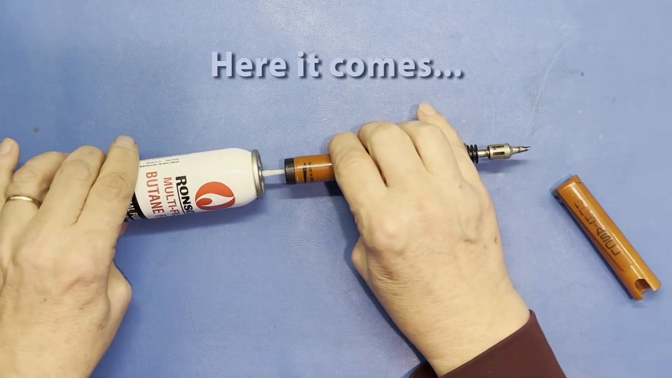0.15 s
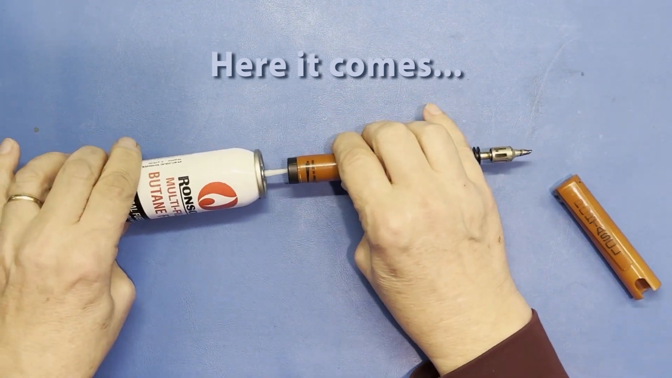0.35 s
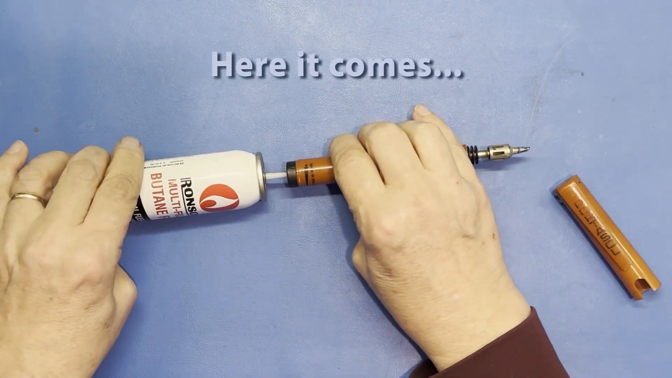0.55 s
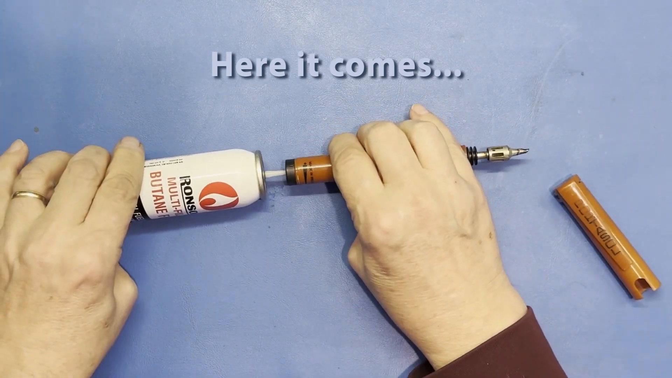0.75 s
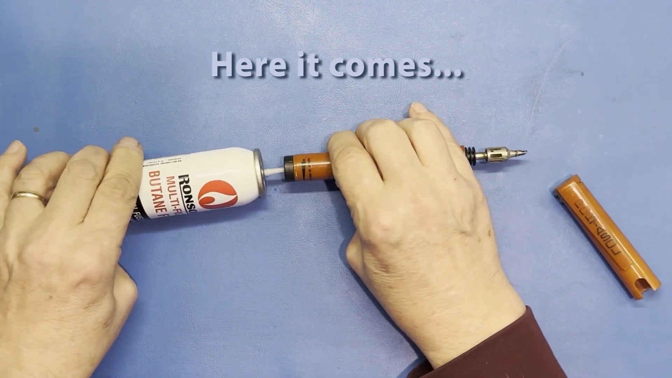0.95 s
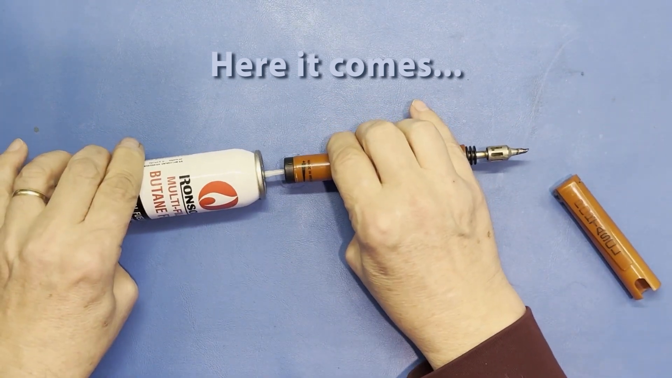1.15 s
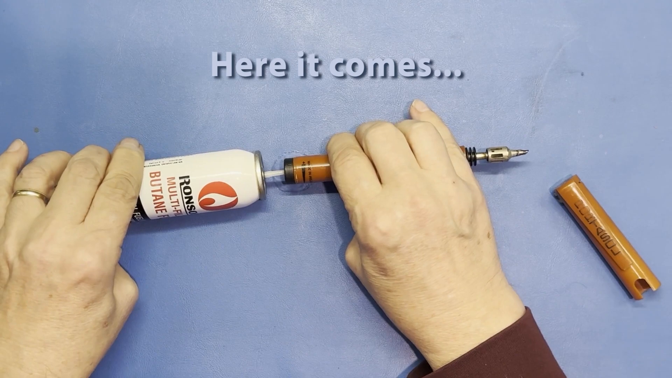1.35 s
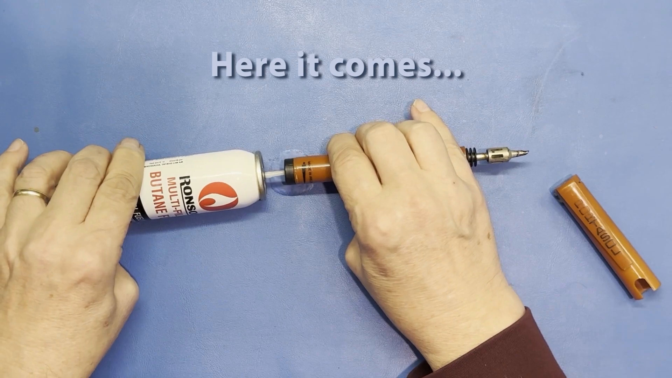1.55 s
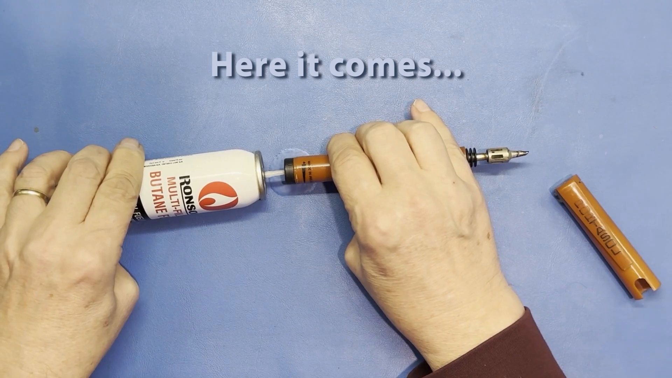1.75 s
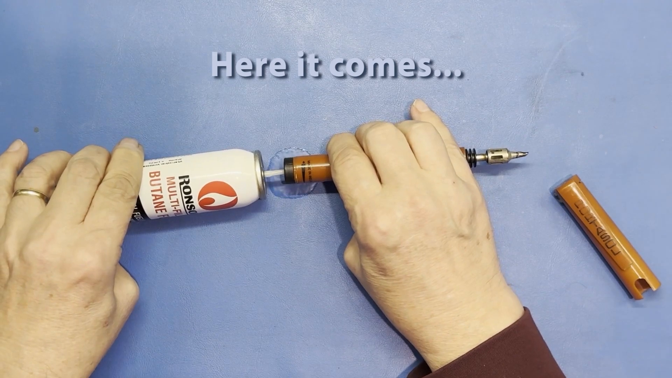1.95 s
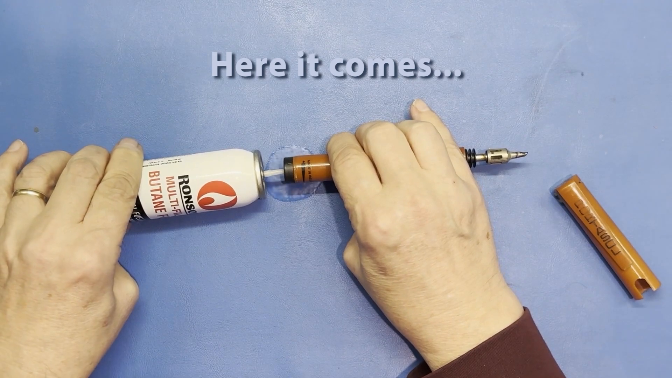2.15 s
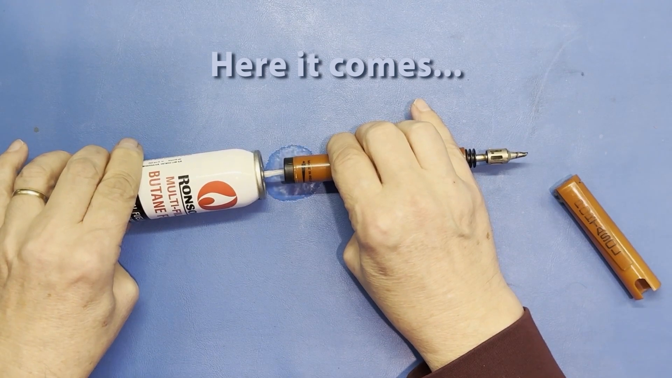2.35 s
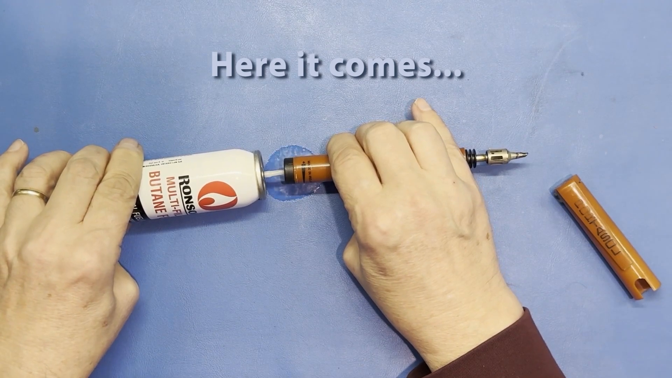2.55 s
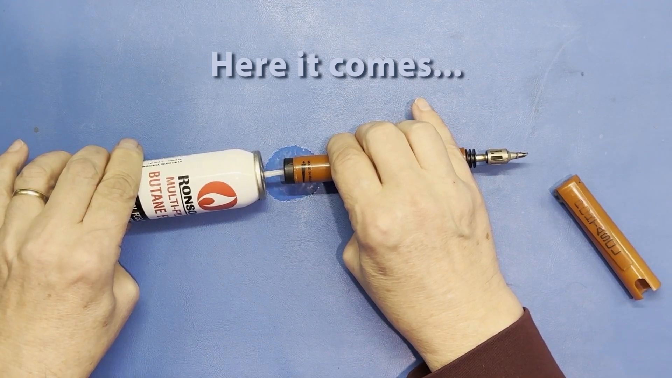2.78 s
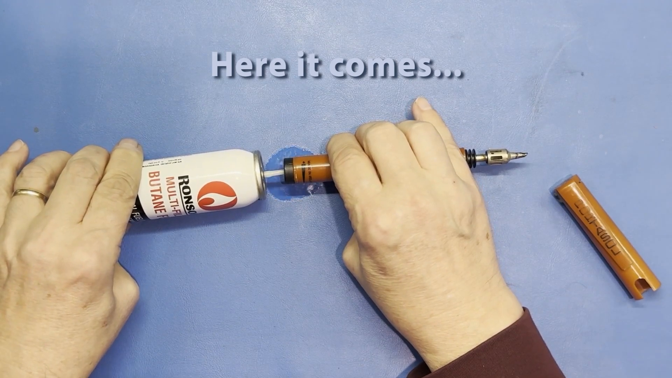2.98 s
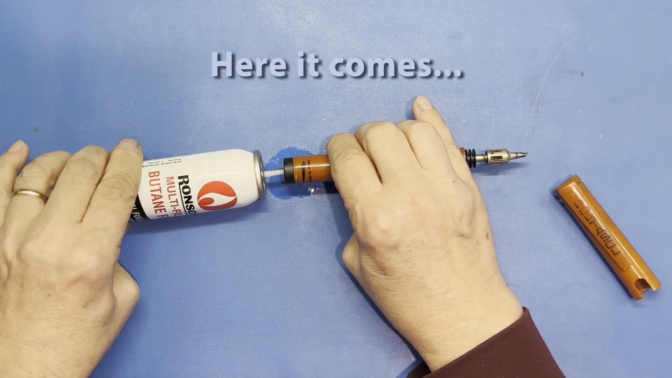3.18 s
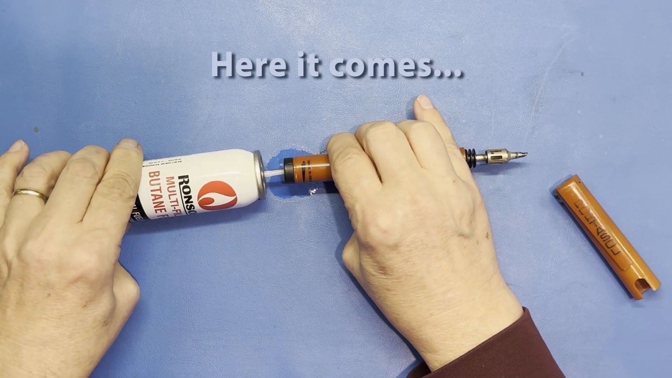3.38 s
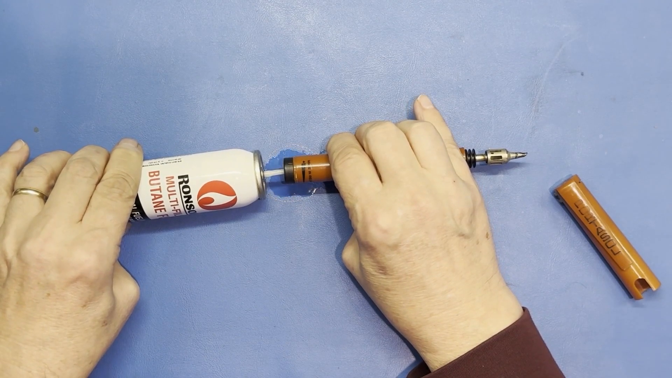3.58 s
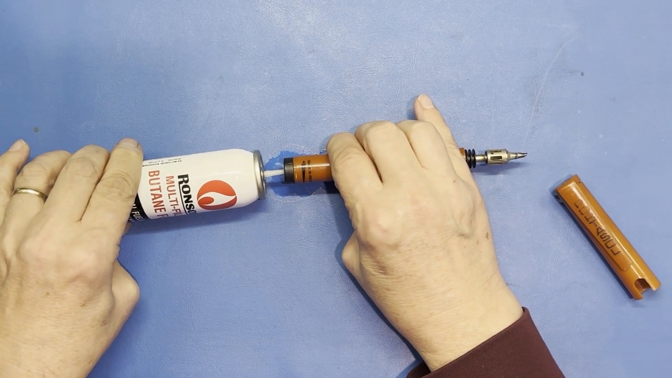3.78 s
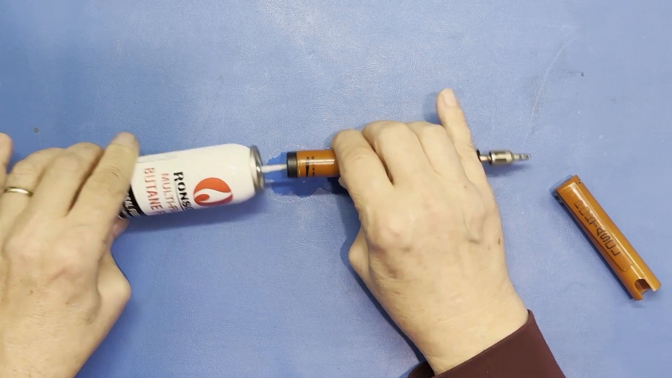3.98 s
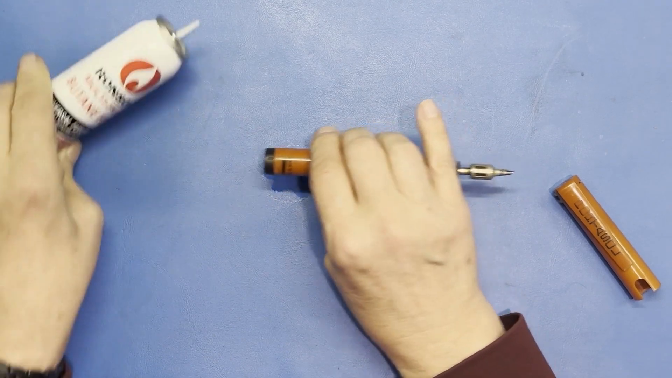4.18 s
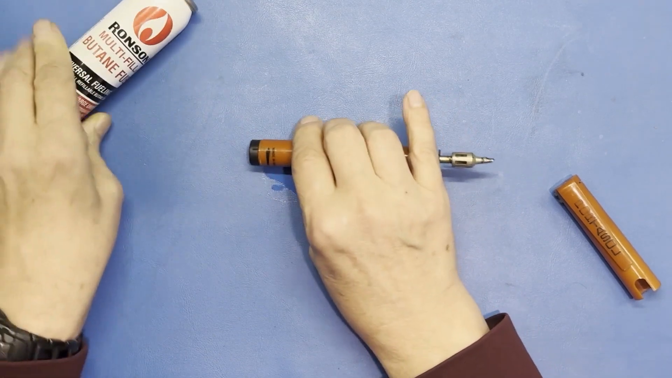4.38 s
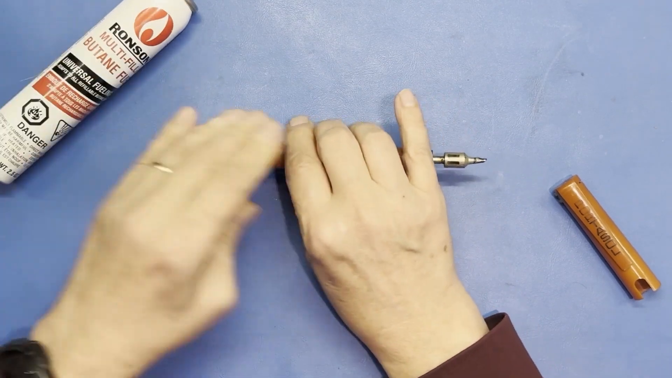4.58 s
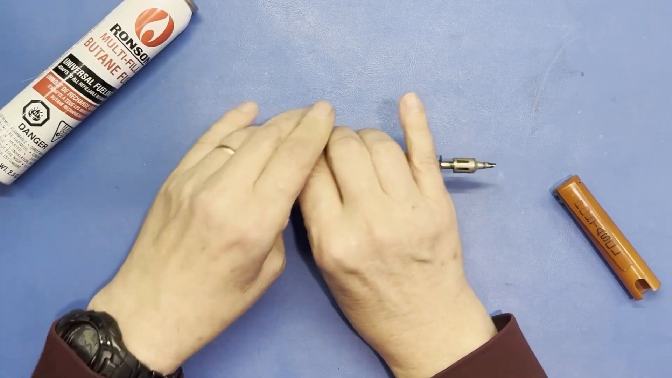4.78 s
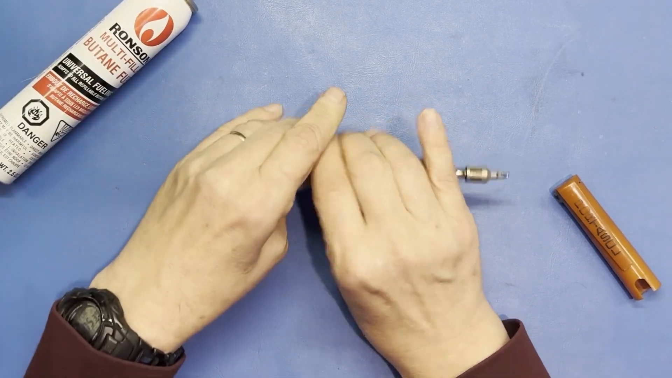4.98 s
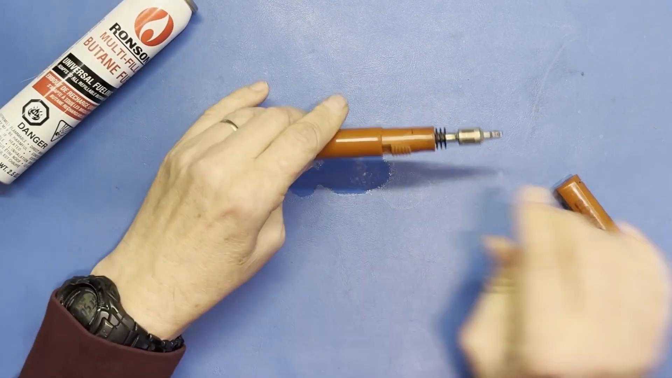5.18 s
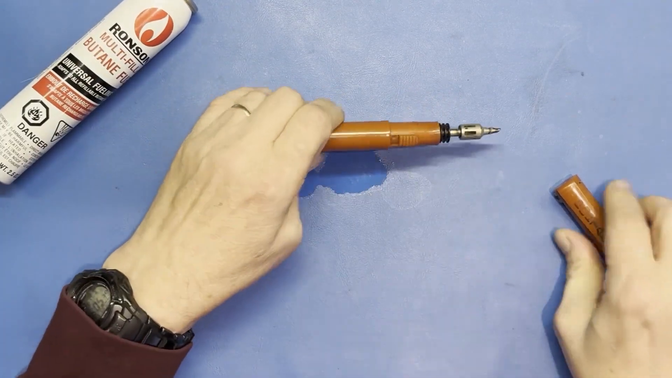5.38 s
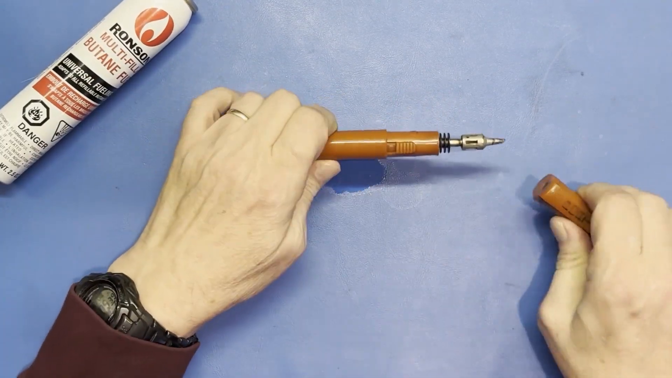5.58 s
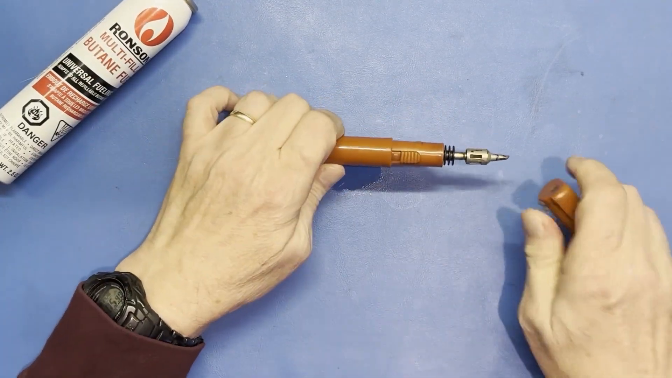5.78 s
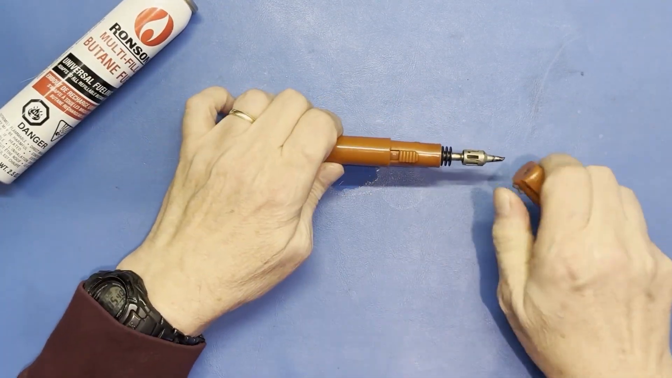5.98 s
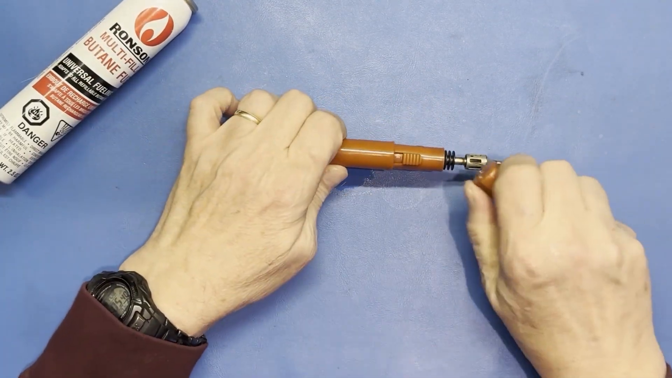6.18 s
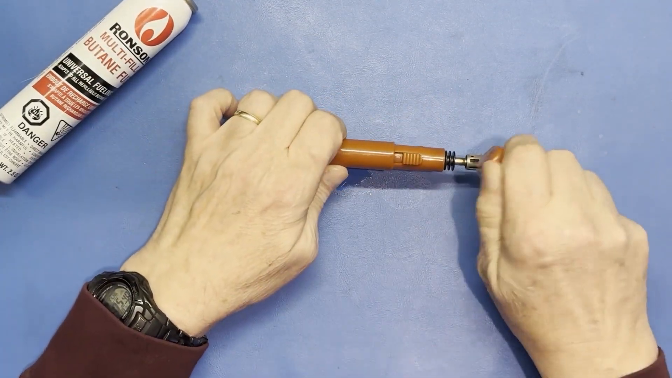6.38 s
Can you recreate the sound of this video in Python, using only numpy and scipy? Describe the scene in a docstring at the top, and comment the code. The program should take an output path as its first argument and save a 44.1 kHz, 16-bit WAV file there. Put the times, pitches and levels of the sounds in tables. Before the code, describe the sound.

Close stereo view of a bench in a small, quiet room, with faint low rumble and barely audible hum throughout. Near silence until 0.43 s, when a light tick opens a valve and gas spits out with an airy rush, quickly growing. At 0.78 s a hard snap with a short metallic ring and thud seats the nozzle. The hiss turns bright and narrow, strong until about 1.1, weaker and sputtering to 2, then uneven swells around 2.1-2.5 and a steady rise from 2.8. At 3.83 a sharp click loosens the joint; the jet dies abruptly at 3.88, another click at 3.94. Spilt liquid crackles and fizzes, fading quickly to a faint simmer. Clustered dull bumps at 4.17-4.3 include a light metal rim tap. A soft knock comes at 4.7, then small ticks, finger rubs and a brief drag at 4.95-5.6. Quiet fizz slowly rises until a short cap scrape at 6.35.

```python
"""First comes a faint low rumble, then a light tick and a spitting hiss as a butane can opens a valve.
The can is pressed into a soldering iron's filler valve; gas and droplets spray from the leaky joint.
The nozzle snaps into its seat, and the jet stops when the can is pulled back.
Spilt butane fizzes on the mat while the can is laid down, the iron is picked up and its cap scrapes.
Shaped noise makes the gas, liquid and rubbing; short bursts and ringing tones make the contacts."""
import sys
import numpy as np
from scipy import signal
from scipy.fft import rfft, irfft, next_fast_len
from scipy.io import wavfile
from scipy.ndimage import uniform_filter1d, map_coordinates

SR = 44100
rng = np.random.default_rng(int(sys.argv[2]) if len(sys.argv) > 2 else 0)


def store_wav(level_fs):
    """Save 16-bit WAV to argv[1]."""
    pcm = np.round(np.clip(np.atleast_2d(level_fs), -1, 1) * 32767)
    wavfile.write(sys.argv[1], SR, pcm.T.astype(np.int16))


N = 283563

# Levels of layers are relative: the final mix scales them. Spectra set only the balance of pitches.

# rumble of the bench: (frequency [Hz], level [dB per Hz])
BENCH_SPECTRUM = [(12, -5.5), (20, -5), (33, 5.5), (45, -10), (65, -12.5), (100, -16), (140, -26),
                  (220, -57)]
# shaking of the microphone mount: (frequency [Hz], level [dB per Hz])
MOUNT_SPECTRUM = [(10, -15.5), (16, -10), (24, 4.5), (33, -1.5), (45, -14), (65, -25), (110, -18.5),
                  (220, -64)]
# leaning on the bench: (time [s], peak [dB], rise [s], fall [s])
BENCH_LEANS = [(0.78, -58, 0.23, 0.47), (4.36, -41.5, 0.16, .14)]
# room air: (frequency [Hz], level [dB per Hz])
ROOM_SPECTRUM = [(50, -29), (90, -3), (150, -4), (320, -7.5), (600, -14), (1000, -22), (2000, -27.5),
                 (8000, -33.5), (11000, -46), (13000, -75.5)]
# mains hum: (frequency [Hz], left level [dB], right level [dB])
HUM_TONES = [(62, -68.5, -74.5), (122, -67, -81), (481, -84, -77)]
SWAY_DB, SWAY_FADE_DB_PER_S = -61, 1.7  # rumble under the hands, less as they relax
ROOM_DB = -69.5

# how alike left and right are for the jet and hard contacts: (frequency [Hz], likeness [0-1])
JET_LIKENESS = [(100, 0), (330, 0.53), (700, 1), (1100, 1), (3100, 1), (4200, 0.67), (7500, 0.66),
                (9500, 0.87), (14000, 0.02)]
# the same for spread-out sounds: (frequency [Hz], likeness [0-1])
SPREAD_LIKENESS = [(130, 0.19), (380, 0.38), (700, 0.66), (1300, 0.85), (2800, 0.99), (4200, 0.64),
                   (7500, 0.54), (14000, 0.19)]
# how long the room's answer lasts: (frequency [Hz], time to fall 60 dB [s])
ROOM_DECAY = [(300, .1), (1500, .06), (4000, .14), (12000, 0.32)]
# reflections off nearby surfaces: (delay [s], level [dB], extra treble delay on the left [s])
EARLY_ECHOES = [(.0031, -24, .00002), (.0074, -16, -.00003), (0.0124, -21.5, .00004),
                (0.0184, -22, -.00002)]

# blows passed into the bench: (time [s], level [dB], brightness [Hz])
BENCH_KNOCKS = [(0.075, -49.5, 600), (0.78, -24, 1010), (1.103, -42.5, 240), (3.882, -42, 504),
                (4.167, -26.5, 350), (4.218, -22, 460), (4.263, -27, 457), (4.296, -22.5, 503),
                (4.713, -39.5, 290), (5.306, -42.5, 86), (5.377, -40, 130)]
# resonances of the bench: (frequency [Hz], width [Hz], level [dB])
BENCH_RESONANCES = [(67, 30, 6), (130, 54, 0.5), (212, 52, -4), (364, 230, -5.5), (684, 380, -3.5)]
# a tap of the can's rim: (frequency [Hz], level [dB per Hz])
RIM_SPECTRUM = [(500, -16), (1300, -7), (2450, 3.5), (3500, -9), (5500, -6), (9000, -10), (12500, -8),
                (14500, -30)]
RIM_S = 4.29  # the rim touches down

# light contacts of nozzle, barrel and fingers: (time [s], level [dB], time to fall 60 dB [s])
LIGHT_CONTACTS = [(0.429, -38, 0.043), (3.827, -15, .02), (3.943, -26.5, .03), (4.263, -46, .025),
                  (4.956, -32.5, 0.022), (5.109, -36, 0.011), (5.156, -43, .012), (5.177, -43, .015),
                  (5.297, -32, 0.014), (5.348, -38.5, 0.093), (6.348, -34, 0.084)]
# small hard parts, also the scraping cap: (frequency [Hz], level [dB per Hz])
HARD_PART_SPECTRUM = [(350, -50), (600, -33), (765, -10), (1600, -23.5), (4970, -8), (6690, 4.5),
                      (9490, 0.5), (10700, -11), (12400, 3), (13300, -13.5), (15000, -77.5)]
# fingers sliding on the barrel: (time [s], peak [dB], rise [s], fall [s])
FINGER_RUBS = [(4.96, -58.5, .025, .1), (5.16, -51.5, 0.078, 0.068), (5.27, -56, .01, 0.022),
               (5.342, -49.5, .006, .01), (5.49, -55, 0.049, 0.043), (5.612, -60, .012, 0.053)]
# skin on the barrel: (frequency [Hz], level [dB per Hz])
SKIN_SPECTRUM = [(180, -48), (300, -12), (1230, -2), (3070, -7.5), (4250, -12), (4770, -3), (5800, -31),
                 (6510, 0), (10800, 0.5), (12500, 8), (15000, -20)]
# the iron on the mat: (frequency [Hz], level [dB per Hz])
MAT_SPECTRUM = [(50, 7), (110, 13), (250, 7), (500, -9), (1200, -9), (3300, 4), (4800, -10), (7000, -16),
                (14000, -46)]
# the iron drags over the mat; the cap slides over the tip (peak time first)
DRAG_S, DRAG_DB, DRAG_RISE_S, DRAG_FALL_S = 5.387, -51.5, 0.02, 0.064
CAP_S, CAP_DB, CAP_RISE_S, CAP_FALL_S = 6.347, -27.5, 0.0064, 0.0038

# boiling of the fresh puddle: (frequency [Hz], level [dB per Hz])
FRESH_SPECTRUM = [(530, -25), (900, -17.5), (1080, -23), (1180, -18), (1360, -20), (2010, -18.5),
                  (2790, -9), (3250, -10), (4060, -5), (4320, -2.5), (5600, -21), (7280, -50),
                  (12300, -120)]
# boiling of the shrinking puddle: (frequency [Hz], level [dB per Hz])
DRYING_SPECTRUM = [(410, -64), (700, -31), (1120, -21), (1370, -24.5), (1990, -21), (2100, -16.5),
                   (2430, -13.5), (2970, -3.5), (3690, -11), (3850, -10), (4430, 1.5), (4750, -12.5),
                   (5600, -13), (7280, -41), (12300, -120)]
# bursting bubbles: (frequency [Hz], level [dB per Hz])
BUBBLE_SPECTRUM = [(2940, -31), (5000, -8), (5400, -10), (6340, -1), (7560, -0.5), (8940, -1),
                   (10800, -4.5), (11700, -22), (12500, -10), (14000, -37)]
# flare-ups of the disturbed puddle: (time [s], extra level [dB], half length [s])
PUDDLE_FLARES = [(4.42, 3, .045), (5.4, 4.5, 0.083)]
SIMMER_DB, SIMMER_FADE_DB_PER_S = -52.5, 5  # the fresh puddle cools the mat and calms down
DRY_S, DRYING_DB, DRYING_GROW_DB_PER_S = 5.15, -61.5, 4  # its thinning edge boils harder again
CRACKLE_DB, FRESH_CRACKLE_DB, CRACKLE_SETTLE_S = -66.5, 23, 0.35  # settled, extra at first, settling time

# the nozzle snapping home: (frequency [Hz], level [dB per Hz])
SNAP_SPECTRUM = [(60, 9), (130, -7), (330, 10.5), (580, -13), (760, 5.5), (1100, -9), (2000, -9.5),
                 (3000, -18), (4000, -3), (4900, -1), (6000, 3.5), (7200, 1.5), (9300, -1), (10600, -29),
                 (12200, -24), (14000, -55)]
# ringing tones of the can: (frequency [Hz], level [dB], time to fall 60 dB [s])
CAN_TONES = [(732, -9.5, 0.083), (910, -16, 0.029), (3520, -3.5, 0.036), (5900, -2, .035)]
SEAT_S = 0.7797  # the nozzle snaps home

# strength of the jet, following the push on the can: (time [s], hiss level [dB])
JET_STRENGTH = [(0.44, -42), (0.57, -30), (1.04, -24), (1.12, -32), (1.14, -30.5), (1.5, -34.5),
                (1.61, -32.5), (1.75, -35), (2.07, -29.5), (2.09, -27), (2.31, -25), (2.37, -29.5),
                (2.39, -24), (2.45, -28), (2.63, -31.5), (2.77, -28), (3.58, -26), (3.86, -21)]
# hiss of the gap with the nozzle loose: (frequency [Hz], level [dB per Hz])
LOOSE_HISS = [(3120, -62), (5300, -19), (5860, -15), (6300, -10), (7500, 0.5), (8560, -12.5), (9520, -7),
              (10600, -22), (11200, -7), (14600, -54), (22000, -120)]
# hiss of the gap with the nozzle just seated: (frequency [Hz], level [dB per Hz])
SEATED_HISS = [(3120, -57), (5300, -48), (6500, -5.5), (7940, 2), (8480, 1.5), (9400, -4), (10300, -8),
               (10800, -23), (11200, 2), (14600, -51.5), (22000, -120)]
# hiss of the gap in steady flow: (frequency [Hz], level [dB per Hz])
FLOWING_HISS = [(3120, -47), (5300, -23), (5580, -25), (6200, -10.5), (6680, -9), (7050, 0.5), (7370, 1.5),
                (8680, 0.5), (9740, -7.5), (10500, -6), (11100, -39), (11400, -20), (14800, -34),
                (22000, -120)]
# lower rush of the loose joint: (frequency [Hz], level [dB per Hz])
LOOSE_RUSH_SPECTRUM = [(150, -44), (250, -12), (277, -18), (480, -18), (677, -9), (1100, -11.5), (1880, -7),
                       (2220, -11), (3220, -2), (3900, -3.5), (4210, 0), (5300, -11.5), (6890, -36),
                       (11700, -120)]
# lower rush of the seated joint: (frequency [Hz], level [dB per Hz])
SEATED_RUSH_SPECTRUM = [(150, -43.5), (250, -26), (342, -17.5), (385, -23.5), (433, -20), (925, -10),
                        (1140, -14), (1600, -6), (2220, -10.5), (2670, -3), (3000, -1), (3470, -6.5),
                        (4160, 2), (5480, -7.5), (5700, -1.5), (7410, -27), (12500, -120)]
# fine spray before much liquid arrives: (frequency [Hz], level [dB per Hz])
DRY_SPRAY_SPECTRUM = [(6290, -24), (10700, -29), (11500, 1.5), (12100, -2.5), (12600, 4), (13600, -34),
                      (14400, -35), (14800, -45)]
# fine spray with more liquid: (frequency [Hz], level [dB per Hz])
WET_SPRAY_SPECTRUM = [(6410, -53.5), (10900, 3), (11300, 3), (12200, 9.5), (13900, 6), (14500, -22),
                      (15300, -32)]
# spurts of liquid that swell the fine spray: (time [s], extra level [dB], half length [s])
LIQUID_SPURTS = [(0.57, 6, 0.035), (0.98, 7, 0.043), (2.325, 0, .02), (2.45, 2, 0.027), (3.84, 3.5, 0.027)]
# steady dips in the hiss: (frequency [Hz], width [Hz], depth [dB])
STEADY_DIPS = [(2260, 48, -7.5), (3535, 47, -9)]
OPEN_S, OPEN_RISE_S = 0.4305, 0.0094  # the valve opens
SHUT_S, SHUT_FALL_S = 3.876, 0.0098  # the can is pulled back and the jet dies
RUSH_DB, RUSH_LAG = -16.5, 0.14  # rush against the hiss, and the dB it lags per dB of hiss
PART_S, PART_SHARE = 3.83, 0.38  # the joint starts to come apart, and how loose it gets (0-1)
LOOSE_RUSH_DB, TIGHTEN_S, LOOSEN_S = 8, 0.36, 0.019  # extra rush when loose; time to tighten, to part
SPRAY_DB = -7.5  # fine spray against the hiss
# a moving dip: where it is at seating, where it ends up, and its creeping time
HOLLOW_SEATED_HZ, HOLLOW_FLOWING_HZ, HOLLOW_CREEP_S = 4810, 5630, 0.9

TOP_HZ = 15100  # upper limit of the finished sound


def amp(db):
    """Decibels to gain."""
    return 10 ** (np.asarray(db) / 20)


def unit(x):
    """Scale to an average (rms) strength of 1."""
    return x / np.sqrt(np.mean(x ** 2) + 1e-20)


def along(points, hz):
    """Read a curve of (frequency, value) points on a log frequency axis."""
    f, values = np.transpose(points)
    return np.interp(np.log(hz + 1), np.log(f + 1), values)


def clock():
    """The time of each sample in seconds."""
    return np.arange(N) / SR


def short_clock():
    """The time of each sample in a quarter-second sound."""
    return np.arange(SR // 4) / SR


def blend(a, b, start, length):
    """Fade steadily from sound a to sound b."""
    share = np.clip((clock() - start) / length, 0, 1)
    return a * (1 - share) + b * share


def held(start, end, rise, fall):
    """Gain 1 from start to end, with an exponential rise before and fall after."""
    t = clock()
    return np.exp(np.minimum(t - start, 0) / rise - np.maximum(t - end, 0) / fall)


def stroke(s, db, rise, fall):
    """A movement swells to its peak at s and dies away."""
    return amp(db) * held(s, s, rise, fall)


def swells(rows):
    """Gain of brief bell-shaped rises above a steady level."""
    t = clock()
    return amp(sum(db * np.exp(-((t - s) / length) ** 2) for s, db, length in rows))


def wobble(rate):
    """A smooth random curve through this many random points a second."""
    knots = rng.standard_normal(int(N * rate / SR) + 4)
    return map_coordinates(knots, [np.arange(N) * rate / SR])


def spits(rate, size, life):
    """Envelope of a steady flow with brief bursts of random size (rate per second, life in s)."""
    bursts = (rng.random(N) < rate / SR) * rng.exponential(size=N)
    fading = signal.lfilter([1], [1, -np.exp(-1 / (life * SR))], bursts)
    return np.sqrt(1 + size * fading)


def turbulence(patchy_db):
    """Two white noises sharing the same drifting patches of louder and softer pitch."""
    z = signal.stft(rng.standard_normal((2, N)), nperseg=512)[2]
    patches = uniform_filter1d(rng.standard_normal(z.shape[1:]), size=4, axis=0)  # smooth over pitch
    patches = uniform_filter1d(patches, size=22, axis=1)  # smooth over time
    return signal.istft(z * amp(patchy_db * unit(patches)), nperseg=512)[1][:, :N]


def filtered(x, response):
    """Filter x with a gain that depends on frequency, complex if it also shifts timing."""
    n = x.shape[-1]
    padded = next_fast_len(n + 8192)
    return irfft(rfft(x, padded) * response(np.fft.rfftfreq(padded, 1 / SR)), padded)[..., :n]


def coloured(pair, spectrum, alike=SPREAD_LIKENESS):
    """Two unrelated signals become left and right with this spectrum and likeness."""
    def response(hz):
        likeness = np.clip(along(alike, hz), -1, 1)
        return amp(along(spectrum, hz)) * np.sqrt([1 + likeness, 1 - likeness])
    mid, side = filtered(pair, response)
    return np.array([mid + side, mid - side])


def noise(spectrum, patchy_db, flutter=1):
    """Spread-out stereo noise of rms 1."""
    return unit(coloured(turbulence(patchy_db) * flutter, spectrum))


def crack(spectrum, t60):
    """A dying burst of noise with peak 1, falling 60 dB in t60 seconds."""
    t = short_clock()
    burst = coloured(rng.standard_normal((2, len(t))), spectrum, JET_LIKENESS)
    burst = burst * amp(-60 * t / t60)
    return burst / np.abs(burst).max()


def add(track, s, sound):
    """Mix a sound into the track at time s."""
    part = track[..., round(s * SR):][..., :sound.shape[-1]]
    part += sound[..., :part.shape[-1]]


def rumble(spectrum):
    """One channel of shaped noise with rms 1."""
    return unit(filtered(rng.standard_normal(N), lambda hz: amp(along(spectrum, hz))))


def background():
    """The bench sways and the microphone mount shakes, over faint room air and mains hum."""
    t = clock()
    sway = amp(SWAY_DB - SWAY_FADE_DB_PER_S * t) + sum(stroke(*lean) for lean in BENCH_LEANS)
    opposed = rumble(BENCH_SPECTRUM) * np.array([[1], [-1]])  # left and right move oppositely
    bench = sway * (rumble(BENCH_SPECTRUM) + 0.5 * opposed)
    mount = amp(-49.0) * rumble(MOUNT_SPECTRUM) * np.array([[1.2], [-0.8]])
    hum = sum(amp([[left], [right]]) * np.sin(2 * np.pi * hz * t) for hz, left, right in HUM_TONES)
    air = amp(ROOM_DB) * unit(coloured(rng.standard_normal((2, N)), ROOM_SPECTRUM))
    return bench + mount + hum + air


def walls(x):
    """The small room answers with fading noise whose decay time depends on pitch."""
    hz, t, z = signal.stft(rng.standard_normal((2, SR // 3)), SR, nperseg=256)
    fade = amp(-60 * t / along(ROOM_DECAY, hz)[:, None])
    tail = signal.istft(z * fade, SR, nperseg=256)[1]
    return signal.fftconvolve(x, tail / np.linalg.norm(tail[0]), axes=1)[:, :N]


def paths(hz):
    """Direct sound, its treble a little later on the left, and early echoes that comb the hiss."""
    apart = np.clip(hz / 4500, 0, 1) ** 3  # the left-right delay grows to its full size in the treble

    def delay(s, left_lag):
        return np.exp(-2j * np.pi * hz * (s + apart * np.array([[left_lag], [0]])))

    return delay(0, 2.15e-5) + sum(amp(db) * delay(s, lag) for s, db, lag in EARLY_ECHOES)


def bench_response(f):
    """The bench's resonances together: each passes a band around its own frequency."""
    return sum(amp(db) * 1j * f * width / (centre * centre - f * f + 1j * f * width)
               for centre, width, db in BENCH_RESONANCES)


def knocks():
    """Can and hands bump the padded bench; softer contacts are duller."""
    out, t = np.zeros((2, N)), short_clock()
    for s, db, bright_hz in BENCH_KNOCKS:
        def thud_response(f):
            softness = 1 + 0.9j * f / bright_hz - (f / bright_hz) ** 2
            return bench_response(f) / softness / (1 + 1j * f / 900)

        # the blow, with the dull shudder of things on the bench
        rattle = amp(-60 * t / 0.15) * rng.standard_normal((2, len(t)))
        shudder = filtered(rattle, lambda f: 1 / (1 + 1j * f / 450))
        thud = filtered((t == 0) + 0.041 * shudder, thud_response)
        add(out, s, amp(db + 2.0) * thud / np.abs(thud).max())
    add(out, RIM_S, amp(-33.0) * crack(RIM_SPECTRUM, t60=0.044))
    return out


def handling():
    """Fingers rub the barrel, the iron drags, the cap scrapes; small hard parts touch."""
    skin = noise(SKIN_SPECTRUM, 1.5, spits(rate=150, size=2.5, life=0.002))
    mat = noise(MAT_SPECTRUM, 2.6, spits(rate=90, size=3, life=0.0014))
    cap = noise(HARD_PART_SPECTRUM, 1.3, spits(rate=400, size=2.5, life=0.00031))
    out = sum(stroke(*rub) for rub in FINGER_RUBS) * skin
    out += stroke(DRAG_S, DRAG_DB, DRAG_RISE_S, DRAG_FALL_S) * mat
    out += stroke(CAP_S, CAP_DB, CAP_RISE_S, CAP_FALL_S) * cap
    for s, db, t60 in LIGHT_CONTACTS:
        add(out, s, amp(db - 1.5) * crack(HARD_PART_SPECTRUM, t60))
    return out


def puddle():
    """Spilt butane boils off in tiny bursting bubbles, which crackle hardest when it is fresh."""
    t = clock()
    age = np.maximum(t - SHUT_S, 0)
    boiling = turbulence(patchy_db=0.5)
    fresh_gain = amp(SIMMER_DB - SIMMER_FADE_DB_PER_S * age)
    fresh = fresh_gain * unit(coloured(boiling, FRESH_SPECTRUM))
    drying_gain = amp(DRYING_DB + DRYING_GROW_DB_PER_S * (t - DRY_S))
    drying = drying_gain * unit(coloured(boiling, DRYING_SPECTRUM))
    simmer = swells(PUDDLE_FLARES) * blend(fresh, drying, DRY_S, 0.39)
    bubbles = spits(rate=230, size=2.0, life=0.001)
    crackle_gain = amp(CRACKLE_DB + FRESH_CRACKLE_DB * np.exp(-age / CRACKLE_SETTLE_S))
    crackle = crackle_gain * noise(BUBBLE_SPECTRUM, 2.1, bubbles)
    return blend(0, simmer + crackle, SHUT_S, 0.01)  # heard once the jet stops


def seating():
    """The nozzle jumps into the valve: a sharp snap that rings the can."""
    out, t = np.zeros((2, N)), short_clock()
    ring = sum(amp(db - 60 * t / t60) * np.sin(2 * np.pi * hz * t) for hz, db, t60 in CAN_TONES)
    snap = np.tanh(2.0 * crack(SNAP_SPECTRUM, t60=0.016))  # the contact holds its force for a moment
    add(out, SEAT_S, amp(-6.0) * snap + amp(-19.0) * ring)
    return out


def hollowed(x, depth_db, width_hz):
    """Narrow dips colour the hiss; one creeps upward together with its octave."""
    hz, t, z = signal.stft(x, SR, nperseg=1024)

    def bell(centre, width):
        return np.exp(-((hz[:, None] - centre) / width) ** 2)

    still_to_go = (HOLLOW_SEATED_HZ - HOLLOW_FLOWING_HZ) * np.exp((SEAT_S - t) / HOLLOW_CREEP_S)
    creeping = HOLLOW_FLOWING_HZ + still_to_go
    steady = sum(db * bell(centre, width) for centre, width, db in STEADY_DIPS)
    moving = depth_db * sum(bell(k * creeping, width_hz) / k for k in (1, 2))
    return signal.istft(z * amp(steady - moving), SR, nperseg=1024)[1][:, :N]


def gas(stream, spectrum):
    """A stream of turbulent gas, rms 1, nearly the same on both sides in the middle pitches."""
    return unit(coloured(stream, spectrum, JET_LIKENESS))


def jet():
    """Gas tears through the gap; droplets of liquid make it sputter."""
    t = clock()
    hiss_db = np.interp(t, *np.transpose(JET_STRENGTH))
    valve = held(OPEN_S, SHUT_S, OPEN_RISE_S, SHUT_FALL_S)
    hiss = amp(hiss_db + 0.67 * wobble(25.04)) * valve
    # the rush is strong while the joint is loose and again as it comes apart
    looseness = held(0, OPEN_S, TIGHTEN_S, TIGHTEN_S)
    looseness = looseness + PART_SHARE * held(PART_S, np.inf, LOOSEN_S, LOOSEN_S)
    # a stronger jet is brighter: its low rush grows less than its hiss
    rush = amp(RUSH_DB + LOOSE_RUSH_DB * looseness - RUSH_LAG * (hiss_db - hiss_db.mean()))
    spray = amp(SPRAY_DB) * swells(LIQUID_SPURTS)
    sputter = spits(rate=300, size=0.6, life=0.00047) * amp(0.89 * wobble(90) + 1.23 * wobble(380))
    edge = sputter * turbulence(2.6)
    core = sputter * turbulence(1.0)
    drops = sputter * turbulence(4.4)
    # the colour follows the shape of the gap
    gap = blend(gas(edge, LOOSE_HISS), gas(edge, SEATED_HISS), SEAT_S, 0.079)
    gap = blend(gap, gas(edge, FLOWING_HISS), 1.1, 0.06)
    body = blend(gas(core, LOOSE_RUSH_SPECTRUM), gas(core, SEATED_RUSH_SPECTRUM), SEAT_S, 0.015)
    # the spray grows finer as liquid arrives
    mist = blend(gas(drops, DRY_SPRAY_SPECTRUM), gas(drops, WET_SPRAY_SPECTRUM), 1.4, 0.7)
    free = amp(1.77) * gap + rush * body + spray * mist
    flow = hiss * blend(free, hollowed(free, depth_db=11.5, width_hz=173), SEAT_S, 0.05)
    # the joint seals for an instant just before the nozzle snaps home
    sealed = np.abs(t - SEAT_S + 0.0022) < 0.0022
    return flow * amp(-18 * uniform_filter1d(sealed * 1.0, size=30))


def scene():
    """The valve lies slightly right of centre, the puddle and the can to the left."""
    slightly_right, to_the_left = amp([[-0.4], [0.4]]), amp([[0.8], [-0.8]])
    near = (jet() + seating()) * slightly_right
    near = near + (puddle() + knocks()) * to_the_left + handling()
    return amp(0.16) * filtered(near, paths) + amp(-22) * walls(near) + background()


def record(dry):
    """Remove everything from the band limit upward."""
    return filtered(dry, lambda hz: hz < TOP_HZ)


dry = scene()
out = record(dry)
store_wav(out)
```